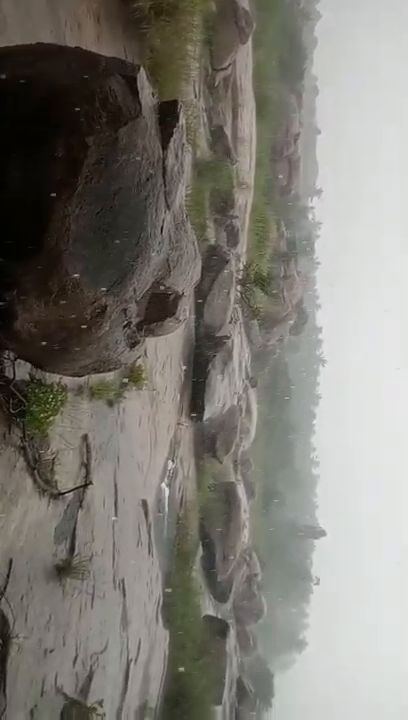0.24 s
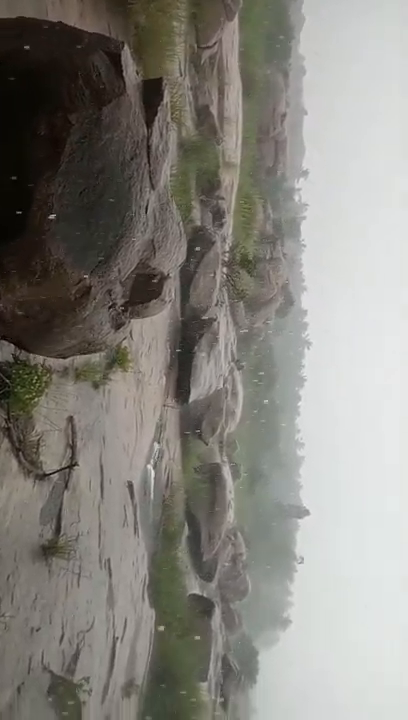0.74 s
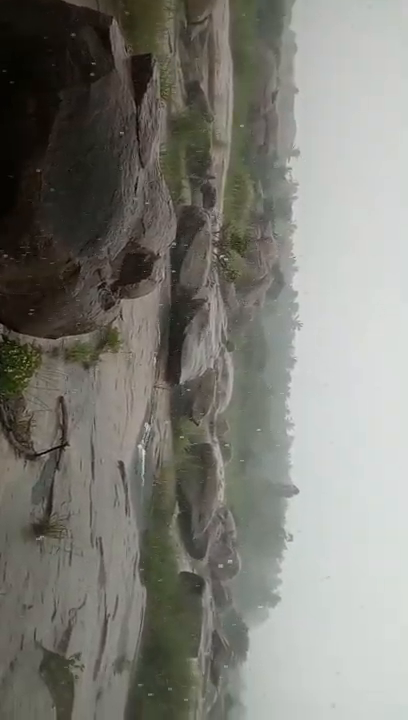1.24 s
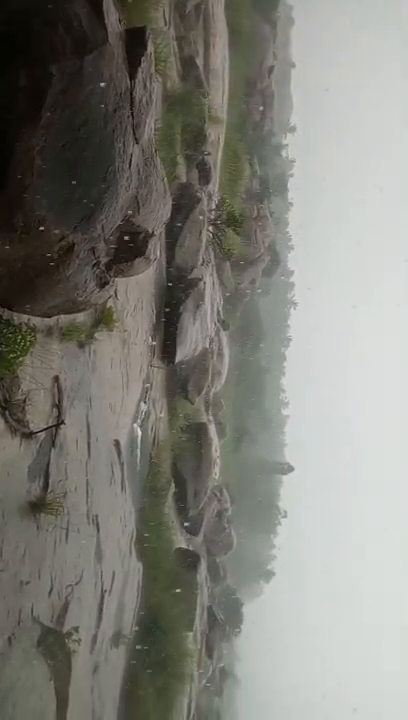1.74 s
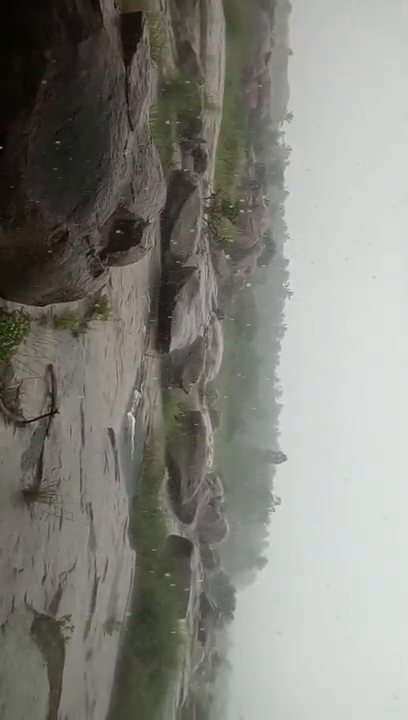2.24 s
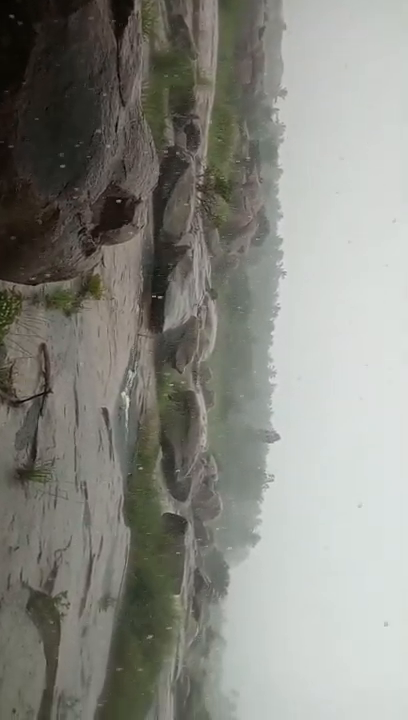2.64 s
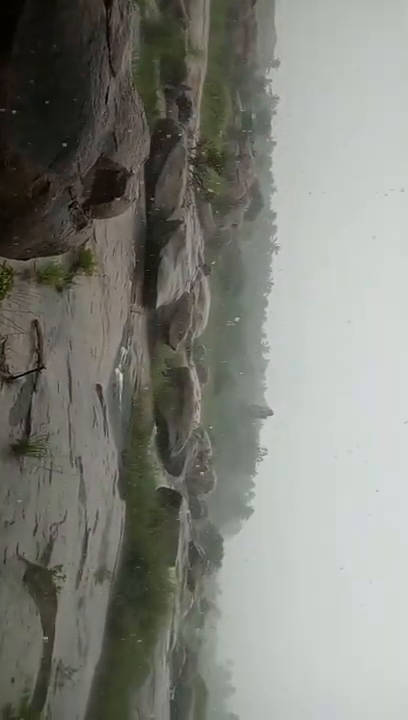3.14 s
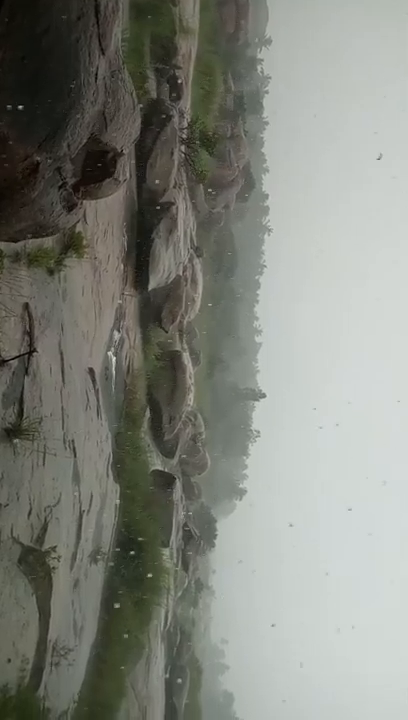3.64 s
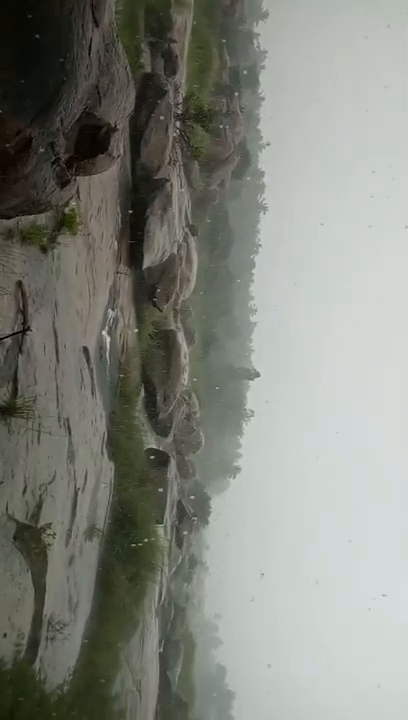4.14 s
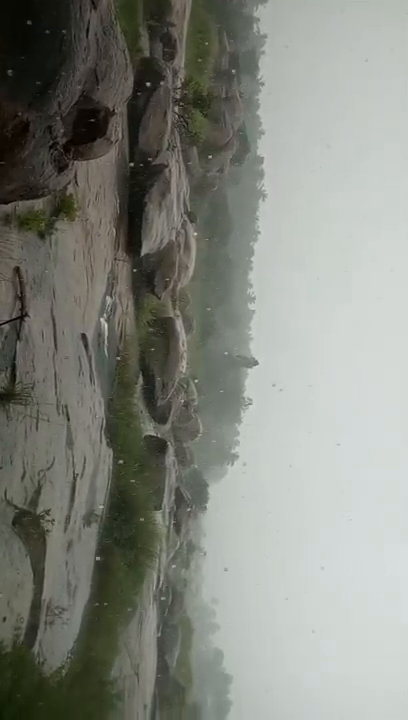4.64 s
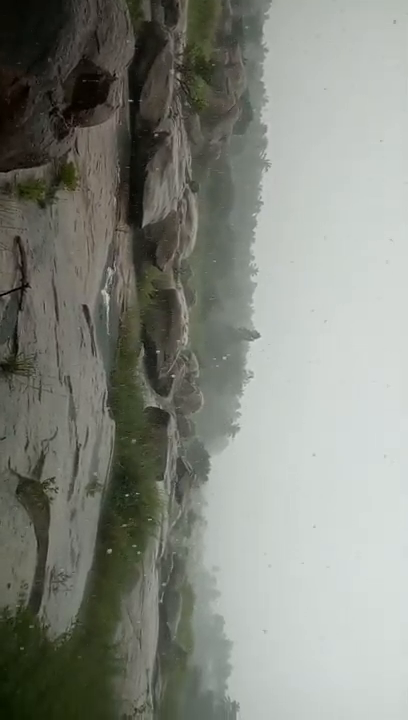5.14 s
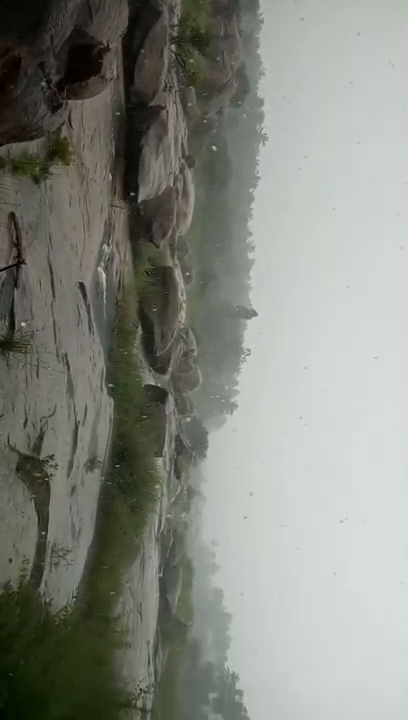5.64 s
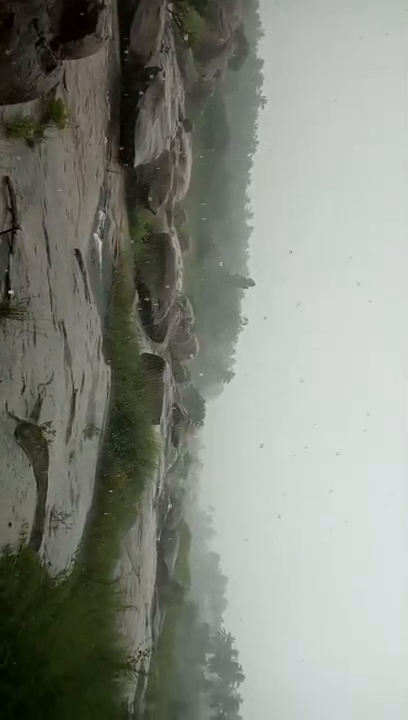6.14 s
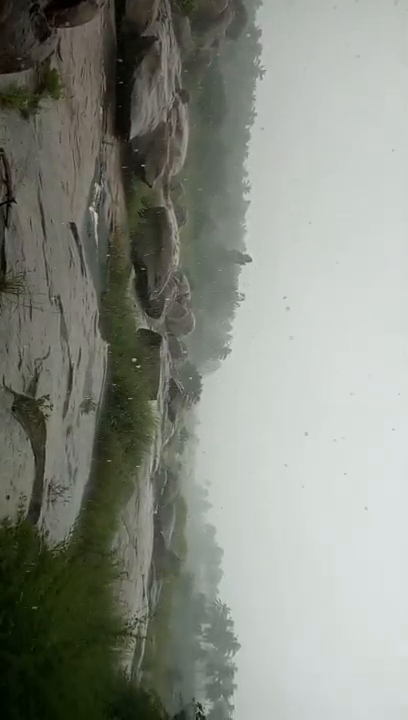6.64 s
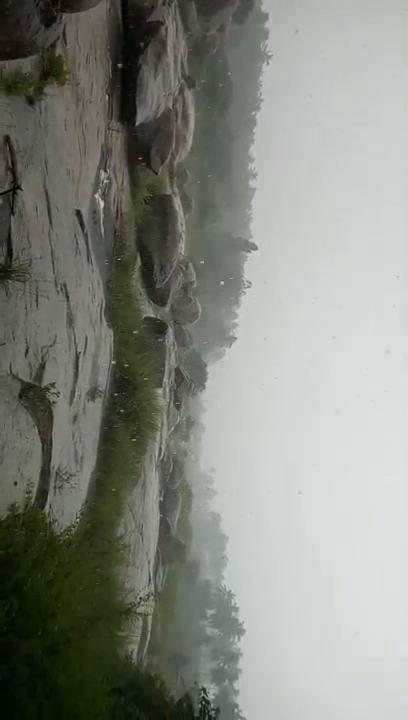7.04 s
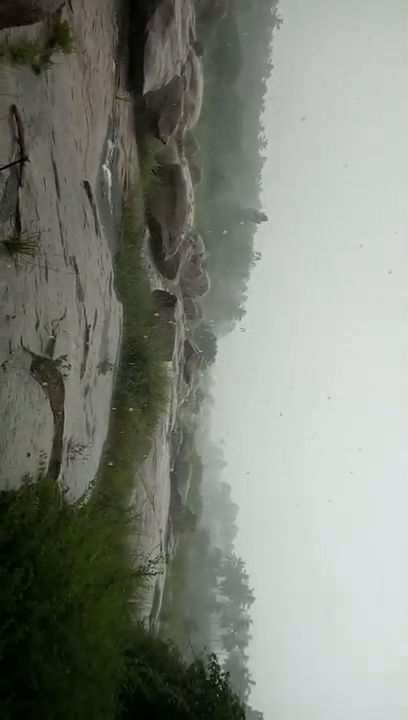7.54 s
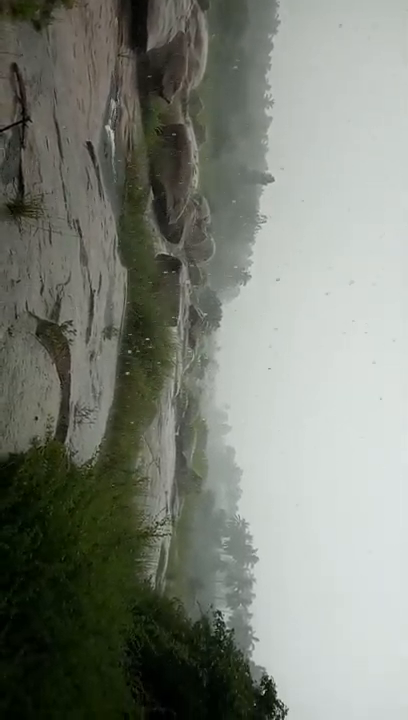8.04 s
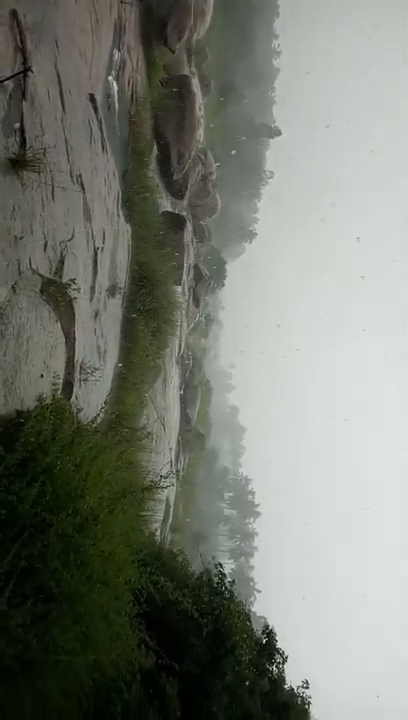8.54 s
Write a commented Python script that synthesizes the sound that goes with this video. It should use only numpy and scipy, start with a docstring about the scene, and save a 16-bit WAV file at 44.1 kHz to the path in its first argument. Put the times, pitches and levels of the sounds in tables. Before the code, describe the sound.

A hissing wash of rain outdoors, dotted with crisp nearby drips, while gusts now and then buffet the microphone.

```python
"""Steady rain on wet rock and grass

Far rain blurs into a wash, nearer drops patter in clumps, and the nearest tick one by one.
Boulders close by give the drops a short echo. A phone hears it all through two small
microphone openings, called ports, which ring near 3 and 6 kHz.
Gusts of wind hit each port on its own and make a low rumble."""
import sys
import numpy as np
from scipy import signal
from scipy.fft import rfft, irfft, next_fast_len
from scipy.io import wavfile
from scipy.ndimage import uniform_filter1d, map_coordinates

SR = 44100
rng = np.random.default_rng(int(sys.argv[2]) if len(sys.argv) > 2 else 0)


def wav_out(sig):
    """Save sig, one row per channel (or a flat mono array), as 16-bit PCM at SR to the path in sys.argv[1]."""
    wavfile.write(sys.argv[1], SR, np.round(np.clip(np.atleast_2d(sig).T, -1, 1) * 32767).astype(np.int16))


N = 386750

# How loud the rain is. Each row: time in seconds, level in dB, fine spray in dB against that level.
RAIN_LEVELS = [(0.0, -40.5, -14), (0.22, -40, -13.5), (3.27, -39, -12), (3.81, -38.5, -14.5),
               (5.49, -39, -12), (5.86, -38, -12), (7.69, -38, -11.5), (7.99, -37, -12), (8.55, -38, -12),
               (8.77, -37, -14)]
# The nearest drops. Each row: start in seconds, rough peak level in dB, pitch in Hz,
# cycles until the ring is loudest, spatter in dB against the drop.
NEAREST_DROPS = [(0.113, -23, 2400, 0.41, -12), (0.1318, -14.5, 3440, 0.27, -15),
                 (0.1596, -13.5, 2300, 0.24, -12.5), (0.2424, -17, 2670, 0.45, -8.5),
                 (0.3222, -17, 6500, 1.0, -6), (0.413, -19.5, 3000, 0.44, -16),
                 (0.5345, -11, 7100, 0.57, -19), (0.579, -18.5, 3740, 0.91, -7.5),
                 (0.6912, -16.5, 3400, 1.1, -12), (0.7194, -16, 3620, 0.55, -16),
                 (0.741, -18, 3400, 0.9, -16), (0.761, -14.5, 2320, 0.39, -15.5),
                 (1.2095, -22, 2300, 0.3, -29), (1.736, -14, 3600, 0.31, -18), (1.761, -19, 3400, 0.76, -5),
                 (1.9089, -19.5, 3700, 0.62, -3), (1.9367, -20, 3380, 0.55, -4.5),
                 (2.4278, -25.5, 2340, 0.8, -2.5), (2.4517, -26.5, 2300, 1.2, -10),
                 (2.4585, -22, 2300, 0.79, -12), (2.462, -18, 2600, 0.5, -12),
                 (2.4976, -18, 3880, 1.3, -16), (2.8435, -14.5, 2800, 0.52, -23),
                 (3.1025, -22.5, 8800, 0.49, -26), (3.5882, -18, 6000, 0.7, -23),
                 (3.6345, -15.5, 5500, 1.2, -3), (3.647, -10, 5800, 1.1, -10), (3.6667, -14, 5390, 1.3, -7),
                 (3.8606, -18, 3620, 0.66, -11), (3.8824, -18.5, 4150, 0.45, -10.5),
                 (4.061, -14.5, 3200, 0.45, -8), (4.207, -14, 4800, 0.71, -24),
                 (4.2337, -17, 5600, 1.4, -17), (4.4017, -12, 3070, 0.48, -21),
                 (4.4722, -21.5, 6540, 1.7, -2), (4.6194, -15, 3240, 0.45, -28),
                 (4.798, -9.5, 3300, 0.26, -28), (4.8012, -11.5, 5100, 0.47, -14),
                 (4.8065, -12, 3420, 0.36, -20), (4.832, -18, 4600, 0.6, -22),
                 (5.1305, -12, 3880, 0.48, -24), (5.7776, -18, 5000, 0.5, -21),
                 (5.9196, -13, 6200, 0.7, -21), (6.0101, -8.5, 4300, 0.32, -16.5),
                 (6.1077, -15.5, 3200, 0.4, -12.5), (6.276, -18, 5800, 0.91, -11),
                 (6.3387, -13, 3840, 0.55, -18), (6.382, -14, 3470, 1.5, -8),
                 (6.4923, -12, 4850, 0.36, -22), (6.6865, -21, 5440, 0.9, -6), (6.702, -18, 4200, 1, -13),
                 (6.737, -16, 3670, 0.38, -6.5), (6.8264, -14, 5170, 0.99, -13),
                 (7.1116, -8, 4100, 0.47, -14.5), (7.1694, -12, 3300, 0.44, -12),
                 (7.247, -15, 8300, 0.6, -19), (7.6363, -14.5, 3280, 0.38, -8),
                 (7.713, -9, 3400, 0.35, -18), (7.8549, -15.5, 3430, 1, -11),
                 (7.8724, -13, 6440, 1.24, -13), (7.9196, -13.5, 3260, 0.58, -12),
                 (8.101, -15, 3350, 0.56, -15), (8.223, -16, 3600, 0.27, -7), (8.2558, -16, 5000, 1.2, -17),
                 (8.2788, -19, 2150, 1.3, -12), (8.2837, -8.5, 3670, 0.58, -13),
                 (8.4065, -18, 3470, 0.5, -15), (8.57, -20.5, 5060, 1.6, -5)]
# How alike the far rain is at the two ports. Each row: frequency in Hz, likeness (1 same, 0 unrelated).
WASH_LIKENESS = [(100, 1), (330, 0.96), (770, 0.92), (1170, -0.22), (2700, -0.014), (15000, 0.044)]
# How each port colours the rain. Each row: frequency in Hz, gain in dB.
LEFT_PORT = [(60, -27), (250, -11), (500, -15.5), (850, -10.5), (1300, -13), (1900, -10.5), (3200, -2),
             (4500, -6), (6000, -1), (6700, -2), (8000, -14), (12000, -15.5), (14000, -17), (15600, -63)]
RIGHT_PORT = [(60, -31), (250, -11.5), (500, -15), (850, -9.5), (1200, -14.5), (1900, -10.5), (2900, -7.5),
              (3900, -7), (4700, -6.5), (5700, -5.5), (8000, -13.5), (12000, -14.5), (14000, -21.5),
              (15600, -25.5)]
# The wind between gusts. Each row: time in seconds, left level in dB, right level in dB.
STEADY_WIND = [(0.0, -34, -52), (0.35, -57, -64), (0.7, -50, -58), (1.1, -42.5, -65), (1.5, -51, -47),
               (1.9, -46, -46), (2.2, -49, -80), (3.1, -49, -52), (3.6, -33.5, -54), (4.0, -40, -68),
               (4.15, -53, -65), (4.9, -45, -63), (5.5, -53.5, -74), (6.25, -49, -43), (6.9, -51, -58.5),
               (7.6, -64, -62), (8.1, -42, -32), (8.77, -26, -30)]
# Swirls of air that hit a port. Each row: start in seconds, hold in seconds, level in dB,
# hardness from 0 to 1, port (0 left, 1 right).
GUSTS = [(0.0, 0.0056, -17, 0.2, 0), (0.03, 0.1, -31.5, 0.03, 0), (0.155, 0.057, -31, 0.24, 0),
         (0.159, 0.027, -15, 0.32, 1), (0.25, 0.0049, -17.5, 0.0, 1), (0.46, 0.064, -30, 0.0, 0),
         (0.534, 0.041, -34, 0, 0), (0.554, 0.0029, -7, 0.1, 1), (1.298, 0.014, -33, 0.15, 0),
         (1.643, 0.031, -31, 0.2, 1), (2.352, 0.087, -29.5, 0.42, 0), (2.664, 0.06, -33, 0.7, 0),
         (2.718, 0.029, -22, 0.58, 0), (2.747, 0.13, -35.5, 0.18, 0), (3.273, 0.043, -24.5, 1.0, 0),
         (3.337, 0.05, -34, 0, 1), (3.341, 0.041, -23, 1, 0), (3.374, 0.052, -21, 1.0, 0),
         (3.456, 0.098, -27.5, 0.45, 0), (3.679, 0.014, -17, 0.17, 0), (3.694, 0.056, -24, 0.85, 0),
         (3.772, 0.038, -27, 0.46, 0), (3.805, 0.2, -32, 0.36, 0), (5.219, 0.066, -42, 0, 0),
         (5.633, 0.021, -37.5, 0.33, 0), (5.689, 0.047, -26.5, 0, 1), (5.754, 0.032, -32.5, 0.1, 1),
         (5.82, 0.023, -29.5, 0, 1), (5.884, 0.0094, -21, 0.2, 1), (5.9, 0.1, -35, 0.2, 1),
         (6.038, 0.007, -14.5, 0.47, 1), (6.069, 0.091, -24.5, 0.27, 1), (6.178, 0.041, -34.5, 0.6, 1),
         (6.275, 0.018, -28.5, 1, 0), (6.308, 0.031, -30, 0.2, 0), (6.646, 0.07, -35.5, 0.44, 0),
         (6.824, 0.037, -39.5, 0.05, 1), (7.748, 0.12, -36, 0.0, 1), (7.902, 0.057, -25, 0.08, 0),
         (7.942, 0.029, -23, 0.2, 1), (7.988, 0.048, -23.5, 0.35, 0), (8.046, 0.07, -26.5, 0.36, 1),
         (8.159, 0.064, -21.5, 0.47, 1), (8.202, 0.027, -26.5, 1.0, 0), (8.258, 0.031, -22, 1.0, 0),
         (8.324, 0.024, -19, 0.82, 1), (8.313, 0.065, -29, 0.2, 0), (8.402, 0.12, -24.5, 0.8, 1),
         (8.44, 0.025, -22, 0.27, 0), (8.485, 0.018, -21, 1.0, 0), (8.576, 0.044, -19, 0.48, 0),
         (8.672, 0.085, -23, 0.4, 0), (8.693, 0.11, -25.5, 0.46, 1)]
# The tone of light wind and of hard wind. Each row: frequency in Hz, relative level in dB.
LIGHT_WIND_TONE = [(20, -7.5), (48, -3), (110, -1), (200, -17.5), (400, -49), (800, -61)]
HARD_WIND_TONE = [(20, -32), (50, -2), (110, 3), (180, 3.5), (300, -6), (500, -22.5), (1000, -73)]

PORT_GAP_S = .0006  # the longest time sound takes from one port to the other
ROCK_CUT_HZ = 750  # solid rock gives a drop no low thud
GUST_RISE_DB_PER_S, GUST_FALL_DB_PER_S, STEADY_HARDNESS = 1300, 902, 0.11
BASS_CUT_HZ, TOP_HZ = 60, 15725


def rain():
    """Wash and patter pass through the ringing ports; the finest spray swells on its own."""
    level_db, spray_db = curves(RAIN_LEVELS)
    on_rock = patter(count=8000, clump_db=2.5, spread_db=5.5, centre_hz=8050, octaves=0.65, cycles=0.63)
    in_puddles = patter(count=5000, clump_db=3, spread_db=2, centre_hz=3060, octaves=0.4, cycles=0.69)
    near = rock_echo(on_rock + amp(-3) * in_puddles, echo_db=-4.5, fade_s=0.11)
    heard = ports(far_wash(patchy_db=1.5) + amp(-3) * near)
    heard /= heard.mean(axis=0).std()
    spray = filtered(heard, lambda hz: 1 / (1 + (7500 / (hz + 1)) ** 8))  # the part above 7500 Hz
    spray_gain = amp(spray_db) / spray.mean(axis=0).std()
    return amp(level_db) * (heard + (spray_gain - 1) * spray)


def far_wash(patchy_db):
    """Far rain: too many drops to tell apart, in drifting patches; the bass is alike at both ports."""
    spectrum = signal.stft(rng.standard_normal((2, N)), nperseg=512)[2]
    patches = rng.standard_normal(spectrum.shape[1:])
    patches = uniform_filter1d(uniform_filter1d(patches, 8, axis=0), 8, axis=1)
    noise = signal.istft(spectrum * amp(patchy_db * patches / patches.std()), nperseg=512)[1][:, :N]
    angle = lambda hz: np.arccos(np.clip(look_up(WASH_LIKENESS, hz), -1, 1)) / 2
    shared, opposite = filtered(noise, lambda hz: np.array([np.cos(angle(hz)), np.sin(angle(hz))]))
    return unit(np.array([shared + opposite, shared - opposite]))


def patter(count, clump_db, spread_db, centre_hz, octaves, cycles):
    """Drops some metres away: they come in clumps, and a few are larger than the rest."""
    chance = np.cumsum(amp(clump_db * wobble(8) + .7 * clump_db * wobble(30)))
    time_draw, size_draw = rng.random((count, 2)).T
    start_s = np.searchsorted(chance / chance[-1], time_draw) / SR
    db = -spread_db * np.log(size_draw + 0.067)
    hz = np.clip(centre_hz * 2 ** (octaves * rng.standard_normal(count)), 1600, 15000)
    return unit(splats(start_s, db, hz, cycles, crack=0.49, pan_db=4.5, samples=72))


def nearest_drops():
    """Each drop in front of the ports ticks sharply, then its splash lands as a run of weaker ticks."""
    start_s, db, hz, cycles, spatter_db = np.transpose(NEAREST_DROPS)
    db = db - look_up(LEFT_PORT, hz)  # strength before the ports colour the tick
    ticks = splats(start_s, db, hz, np.clip(cycles, .2, 4),
                   crack=0.2, pan_db=-15, samples=200, centre=0, scatter=0.12)
    delay_s = 0.001207 + rng.exponential(.016, (len(start_s), 16))  # 16 droplets a splash
    droplet_db = (db + spatter_db)[:, None] - 60 * delay_s + 0.85 * rng.standard_normal(delay_s.shape)
    droplet_hz = hz[:, None] * amp(1.9 * rng.standard_normal(delay_s.shape))
    spatter = splats((start_s[:, None] + delay_s).ravel(), droplet_db.ravel(), droplet_hz.ravel(),
                     cycles=1.96, crack=1.76, pan_db=2.5, samples=128)
    on_rock = filtered(ticks + spatter, lambda f: low_cut(f, ROCK_CUT_HZ))
    return ports(rock_echo(on_rock, echo_db=-5, fade_s=.025))


def splats(start_s, db, hz, cycles, crack, pan_db, samples, centre=.5, scatter=.4):
    """Drops landing: each is a dying ring with a soft wet start and a crack of noise."""
    t = np.arange(samples) / SR
    side = np.clip(rng.normal(centre, scatter, len(start_s)), -1, 1)  # +1 left, -1 right
    crack_gain = crack / np.maximum(cycles, 1) ** 2  # a long ring is cleaner
    noise = (crack_gain * rng.standard_normal((samples, len(start_s)))).T
    out = np.zeros((2, N))
    for port, sign in enumerate((1, -1)):
        pitch = hz * amp(0.22 * rng.standard_normal(len(start_s)))  # each port hears its side of a splash
        age = np.outer(pitch / cycles, t)
        swell = age * np.exp(1 - age)
        splat = swell * (np.sin(2 * np.pi * np.outer(pitch, t)) + noise)
        splat /= np.abs(splat).max(axis=1, keepdims=True)
        splat *= amp(db + sign * pan_db * side)[:, None]
        arrival = np.round((start_s - sign * side * PORT_GAP_S / 2) * SR).astype(int)
        where = np.clip(arrival[:, None] + np.arange(samples), 0, N - 1)
        out[port] = np.bincount(where.ravel(), splat.ravel(), N)  # add up all the drops
    return out


def rock_echo(x, echo_db, fade_s):
    """Boulders close by scatter each tick into a short tail that falls 60 dB in fade_s."""
    t = np.arange(4096) / SR
    tail = rng.standard_normal((2, len(t))) * amp(-60 * t / fade_s) * (t > .0006)
    return x + amp(echo_db) * signal.fftconvolve(x, tail / np.linalg.norm(tail[0]), axes=1)[:, :N]


def ports(x):
    """The two ports colour the sound and ring just after each tick."""
    return filtered(x, lambda hz: causal(amp([look_up(LEFT_PORT, hz), look_up(RIGHT_PORT, hz)])))


def gusts():
    """Wind level and hardness at each port: a gust rises above the steady wind, holds and falls."""
    t = np.arange(N) / SR
    level_db = curves(STEADY_WIND) + 2 * np.array([wobble(20), wobble(6.5)])  # it comes in puffs
    hardness = np.full(level_db.shape, STEADY_HARDNESS)
    for start_s, hold_s, db, gust_hardness, port in GUSTS:
        port = round(port)
        span = slice(max(round((start_s - .1) * SR), 0), round((start_s + hold_s + .1) * SR))
        age = t[span] - start_s
        gust_db = db - GUST_RISE_DB_PER_S * np.maximum(-age, 0)
        gust_db -= GUST_FALL_DB_PER_S * np.maximum(age - hold_s, 0)
        hardness[port, span][gust_db > level_db[port, span]] = gust_hardness
        level_db[port, span] = np.maximum(level_db[port, span], gust_db)
    return zip(level_db, np.clip(uniform_filter1d(hardness, size=441), 0, 1))


def wind_rumble(level_db, hardness):
    """Air swirls on one port: the harder it hits, the higher in pitch the rumble reaches."""
    noise = rng.standard_normal(N)
    light = unit(filtered(noise, lambda hz: amp(look_up(LIGHT_WIND_TONE, hz))))
    hard = unit(filtered(noise, lambda hz: amp(look_up(HARD_WIND_TONE, hz))))
    swirls = (1 - hardness) * light + hardness * hard
    power = np.abs(uniform_filter1d(swirls ** 2, 900))
    even = swirls / np.sqrt(power + 0.044)  # evened out, so the gust sets the strength
    return amp(level_db + 2.45 * wobble(32)) * unit(even)


def amp(db):
    """Turn decibels into a multiplier."""
    return 10 ** (np.asarray(db) / 20)


def unit(x):
    """Scale each channel to an average power of 1."""
    return x / np.sqrt(np.mean(x ** 2, axis=-1, keepdims=True) + 1e-20)


def look_up(table, hz):
    """Read a table between its rows, on a log frequency scale."""
    table_hz, values = np.transpose(table)
    return np.interp(np.log(hz + 1), np.log(table_hz + 1), values)


def curves(table):
    """Give each column after the time one value per sample."""
    times, *columns = np.transpose(table)
    return [np.interp(np.arange(N) / SR, times, column) for column in columns]


def wobble(rate):
    """A smooth curve through this many random points a second."""
    return map_coordinates(rng.standard_normal(1000), [np.arange(N) * rate / SR])


def filtered(x, response):
    """Multiply each frequency in x by response(hz)."""
    size = next_fast_len(N + SR // 2)
    return irfft(rfft(x, size) * response(np.fft.rfftfreq(size, 1 / SR)), size)[..., :N]


def low_cut(hz, cut_hz):
    """A filter response that weakens sound below cut_hz."""
    return (1j * hz / (cut_hz + 1j * hz)) ** 2


def causal(gain):
    """A filter response with this gain that never sounds before a hit (minimum phase)."""
    cepstrum = irfft(np.log(gain))
    half = cepstrum.shape[-1] // 2
    cepstrum[..., 1:half] *= 2
    cepstrum[..., half + 1:] = 0
    return np.exp(rfft(cepstrum))


def scene():
    """Rain all around, wind on each port."""
    return rain() + nearest_drops() + np.array([wind_rumble(db, hardness) for db, hardness in gusts()])


def record(dry):
    """The phone cuts the deep bass and keeps nothing above TOP_HZ."""
    return filtered(dry, lambda hz: low_cut(hz, BASS_CUT_HZ) * (hz < TOP_HZ))


dry = scene()
out = record(dry)
wav_out(out)
```